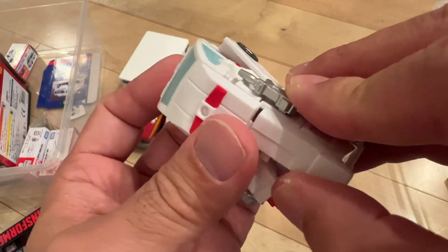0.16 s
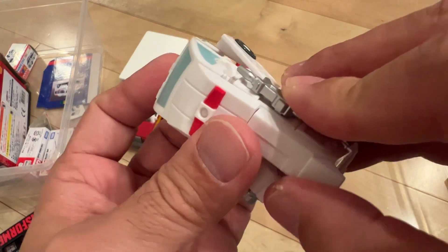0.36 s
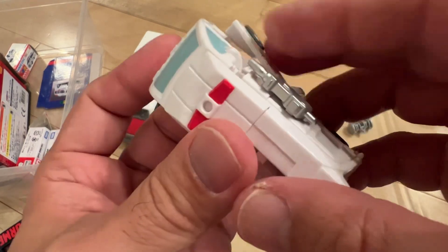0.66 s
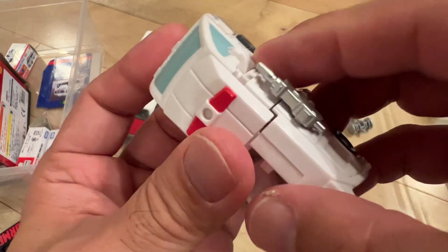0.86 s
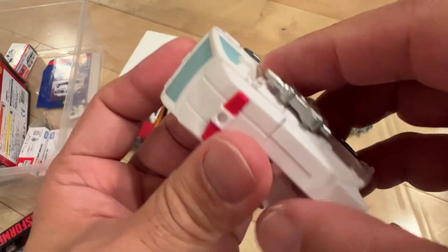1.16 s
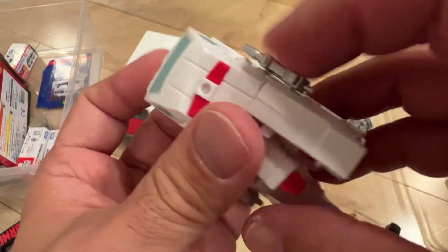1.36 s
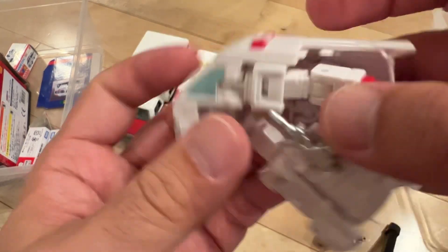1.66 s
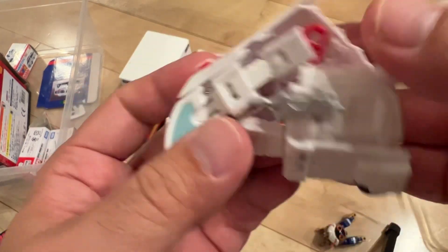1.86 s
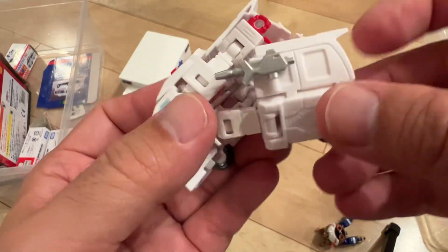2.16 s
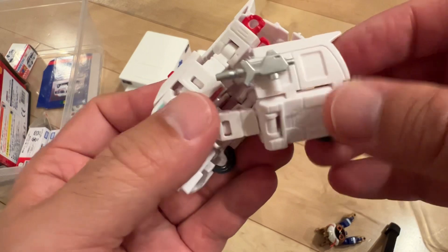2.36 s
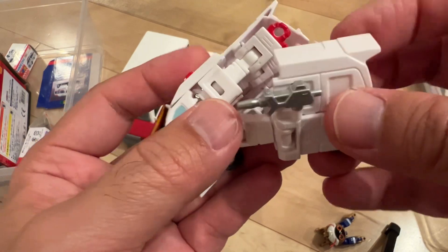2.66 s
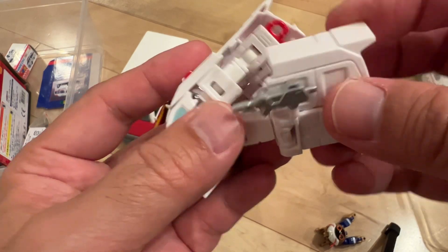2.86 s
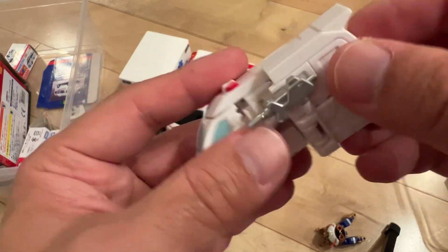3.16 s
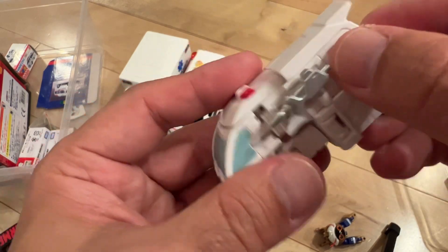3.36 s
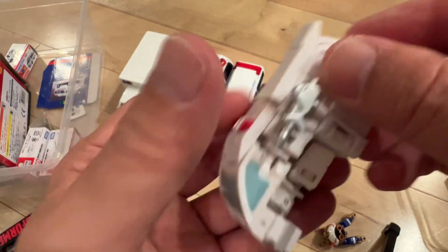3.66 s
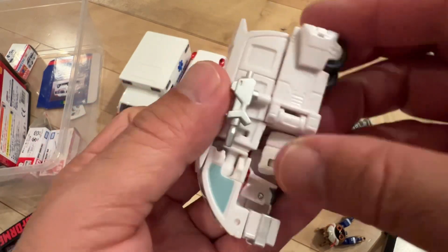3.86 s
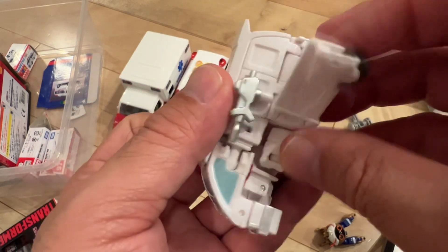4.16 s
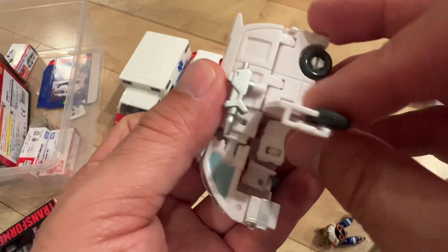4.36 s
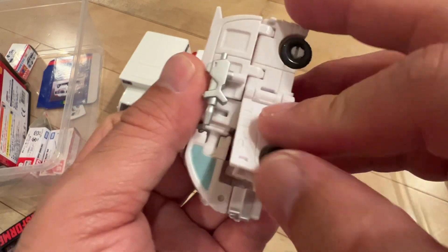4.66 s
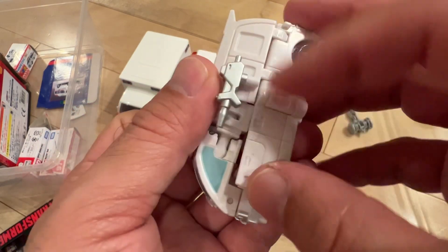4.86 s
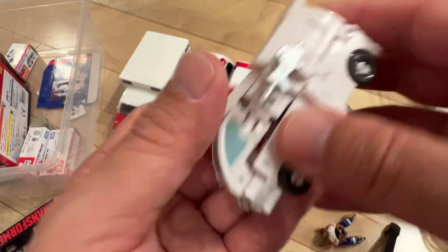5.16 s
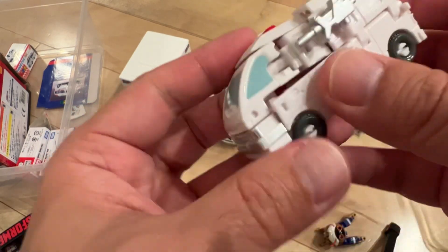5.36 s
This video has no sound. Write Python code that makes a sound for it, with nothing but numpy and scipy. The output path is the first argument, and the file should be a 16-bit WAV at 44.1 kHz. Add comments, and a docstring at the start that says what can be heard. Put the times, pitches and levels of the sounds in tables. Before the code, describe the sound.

Crisp plastic joints click and snap unevenly as fingers turn a little toy indoors, with soft scrapes, tiny creaks and quiet hum beneath.

```python
"""In a small room, close to a pair of microphones, hands fold a plastic toy car: tabs catch, joints snap, panels knock.
Each contact is a noise crack plus short ringing modes of the hollow shell; every snap also jolts the toy with a thud.
Fingers and panels rub in between as rough, slip-broken noise, and stiff hinges creak as irregular slips ring a panel.
The room answers with a diffuse tail, over shaped-noise rumble, a faint hum of sines and a thin, narrow-noise whine."""
import sys
import numpy as np
from scipy import signal
from scipy.fft import rfft, irfft, next_fast_len
from scipy.io import wavfile
from scipy.ndimage import map_coordinates

SR = 44100
rng = np.random.default_rng(int(sys.argv[2]) if len(sys.argv) > 2 else 0)


def master_out(mix):
    """Clip the mix to full scale and print it as 16-bit PCM to the path in sys.argv[1]."""
    frames = np.transpose(np.atleast_2d(mix))
    ceiling = np.clip(frames, -1, 1)
    pcm = np.round(ceiling * 32767).astype(np.int16)
    wavfile.write(sys.argv[1], SR, pcm)


N = 243431


def amp(db):
    """Decibels to gain."""
    return 10 ** (np.asarray(db) / 20)


def unit(x):
    """Scale to rms 1."""
    return x / np.sqrt(np.mean(x ** 2) + 1e-20)


def along(points, hz):
    """Read a curve of (Hz, value) points on a log frequency axis."""
    f, value = np.transpose(points)
    return np.interp(np.log(hz + 1), np.log(f + 1), value)


def filtered(x, response):
    """Shape x by a complex response of frequency."""
    n = x.shape[-1]
    padded = next_fast_len(n + n // 4)
    return irfft(rfft(x, padded) * response(np.fft.rfftfreq(padded, 1 / SR)), padded)[..., :n]


def resonance(f, hz, width_hz):
    """Causal response of one damped resonance."""
    return 1j * f * width_hz / (hz * hz - f * f + 1j * f * width_hz)


def wobble(rate):
    """A smooth random curve with rate knots a second."""
    knots = rng.standard_normal(int(N * rate / SR) + 4)
    return map_coordinates(knots, [np.arange(N) * rate / SR])


def lean(pair, points):
    """Shade the right microphone by the (Hz, left-minus-right dB) points."""
    return filtered(pair, lambda f: amp([0 * f, -along(points, f)]))


def add(track, start_s, sound):
    """Mix a sound into a track at start_s."""
    part = track[..., max(round(start_s * SR), 0):][..., :sound.shape[-1]]
    part += sound[..., :part.shape[-1]]


# Colour of the steady room rumble: pitch_hz, relative density_db [dB per Hz]
RUMBLE_COLOUR = [(20, -43.5), (32, -29), (45, -6.5), (65, -3), (100, -3), (130, -6), (200, -8), (300, -17),
                 (450, -21), (800, -25.5), (1500, -35.5), (2800, -44), (8000, -57.5), (16000, -68)]
# Left-right likeness of the rumble: pitch_hz, coherence [0 to 1]
RUMBLE_LIKENESS = [(60, 1), (125, .9), (250, 0.57), (500, 0.19), (1200, 0.083), (8000, .1)]
# Partials of the faint hum: pitch_hz, level_db [rms, before hum_gain_db]
HUM_PARTIALS = [(62, -63), (120, -67), (344, -76), (694, -84.5), (815, -85)]


def background(rumble_db=-55.5, hum_gain_db=1, whine_db=-86, whine_hz=5130):
    """Low indoor rumble, most alike at both microphones in the bass, an unsteady hum and a thin high whine."""
    # the split between mid and side sets the likeness
    turn = lambda f: np.arccos(np.clip(along(RUMBLE_LIKENESS, f), -1, 1)) / 2
    colour = lambda f: amp(along(RUMBLE_COLOUR, f)) * [np.cos(turn(f)), np.sin(turn(f))]
    mid, side = filtered(rng.standard_normal((2, N)), colour)
    rumble = unit(np.array([mid + side, mid - side]))

    t = np.arange(N) / SR
    hum = np.zeros(N)
    for hz, db in HUM_PARTIALS:
        level = amp(db + 0.63 * wobble(3)) * np.sqrt(2)
        hum += level * np.sin(2 * np.pi * hz * t + 1.1 * wobble(4.5))

    whine = unit(filtered(rng.standard_normal((2, N)), lambda f: resonance(f, whine_hz, 350) ** 2))
    return amp(rumble_db) * rumble + amp(hum_gain_db) * hum + amp(whine_db) * whine


def friction(slips_per_s, slip_share, alike):
    """Stereo noise of sliding contact: a fine hiss broken by tiny slips of uneven size."""
    struck = rng.exponential(size=N)
    sizes = amp(4 * np.minimum(struck, 3)) * (rng.random(N) < slips_per_s / SR)
    decay = amp(-60 * np.arange(SR // 50) / SR / 0.0086)
    slips = unit(signal.fftconvolve(sizes, decay)[:N])
    share, alike = np.clip([slip_share, alike], 0, 1)
    noise = np.sqrt(alike) * rng.standard_normal(N) + np.sqrt(1 - alike) * rng.standard_normal((2, N))
    return noise * np.sqrt(1 - share + share * slips ** 2)


# Strokes of fingers and panels, one for each move of the hands:
# middle_s, length_s, scrape_db [panels], swish_db [skin]
HAND_STROKES = [(0.566, 0.21, -84, -69), (1.21, 0.13, -68.5, -69), (1.392, 0.055, -72.5, -67),
                (1.652, 0.32, -69, -67.5), (2.121, 0.048, -68, -73.5), (2.256, 0.091, -74, -78.5),
                (2.471, 0.1, -58.5, -60.5), (2.878, 0.041, -58.5, -69), (3.137, 0.24, -74.5, -71.5),
                (3.363, .04, -53, -54), (3.728, 0.13, -65.5, -65), (3.966, 0.087, -72.5, -74),
                (4.225, 0.11, -68.5, -70), (4.536, 0.052, -57, -56), (4.971, 0.11, -64, -70.5),
                (5.416, 0.18, -70, -75.5)]


def stroke_level(t, peaks_db, grip_db):
    """Gain at times t: each stroke swells and fades over the resting grip."""
    middle, length = np.transpose(HAND_STROKES)[:2]
    swell = np.exp(-(2 * (t[:, None] - middle) / length) ** 2)
    return np.sqrt(swell @ amp(peaks_db) ** 2 + amp(grip_db) ** 2)


# Colour of skin on smooth plastic: pitch_hz, relative density_db [dB per Hz]
SKIN_COLOUR = [(500, -23), (2500, -5.5), (5500, -3), (7500, -10.5), (9000, 4), (10500, -14), (11800, -4),
               (13500, -14), (15300, -8.5), (16300, -11.5)]
# Body resonances that shape the scraping: pitch_hz, width_hz, relative level_db
BODY_RESONANCES = [(1500, 1500, -8), (3050, 170, 1.5), (3360, 370, -5.5), (4140, 200, -2), (4700, 760, -14),
                   (6500, 1100, -8)]


def body(f):
    """Response of the toy's body: resonances summed with alternating sign."""
    return sum((-1) ** k * amp(db) * resonance(f, hz, width)
               for k, (hz, width, db) in enumerate(BODY_RESONANCES))


def rubbing(grip_db=-85):
    """In each stroke skin swishes on plastic and panels scrape, sounding the body; the grip never quite rests."""
    _, _, scrape_db, swish_db = np.transpose(HAND_STROKES)
    coarse_t = np.arange(0, N, 64) / SR
    level = lambda db: np.interp(np.arange(N) / SR, coarse_t, stroke_level(coarse_t, db, grip_db))
    scrape = filtered(friction(slips_per_s=840, slip_share=0.44, alike=0.74), body)
    swish = friction(slips_per_s=500, slip_share=0.29, alike=.93)
    swish = filtered(swish, lambda f: amp(along(SKIN_COLOUR, f)))
    return level(scrape_db) * unit(scrape) + level(swish_db) * unit(swish)


# Decay of the room's answer: pitch_hz, t60_s
ROOM_DECAY = [(200, 0.1), (1500, 0.5), (4500, 0.4), (8000, .34), (14000, 0.27)]
# Colour of the room's answer: pitch_hz, gain_db [added to wet_db]
ROOM_TONE = [(200, -4.5), (1500, -8.5), (3200, -6.5), (6000, 0.5), (8000, -1.5), (10000, -21), (15000, -7)]


def room(x, wet_db, gap=0.00047):
    """Floor and walls return a diffuse noise tail, drawn afresh every quarter second; gap is its rise in s."""
    out, size = np.zeros((2, N)), SR // 4
    for start in range(0, N, size):
        hz, t, z = signal.stft(rng.standard_normal((2, SR // 2)), SR, nperseg=256)
        decay = amp(-60 * t / along(ROOM_DECAY, hz)[:, None])
        tail = signal.istft(z * decay, SR, nperseg=256)[1]
        tail = tail * (1 - np.exp(-np.arange(tail.shape[1]) / SR / gap))
        tail = tail / np.linalg.norm(tail[0])
        add(out, start / SR, signal.fftconvolve(x[None, start:start + size], tail, axes=1))
    return amp(wet_db) * filtered(out, lambda f: amp(along(ROOM_TONE, f)))


def loose_contacts(count=36, level_db=-68, follows=0.92, usual_db=-69, scatter_db=3,
                   knock_db=-2, part_db=0, tick_db=-5, part_hz=4100, spread=.08):
    """Loose parts tick faintly at random, more strongly while the hands move."""
    chance = rng.standard_normal((count, 4))
    times = (np.arange(count) + rng.random(count)) / count * N / SR
    scrape_db = np.transpose(HAND_STROKES)[2]
    moving_db = 20 * np.log10(stroke_level(times, scrape_db, grip_db=-79.5)) - usual_db
    return [(s, level_db + follows * move_db + scatter_db * a, knock_db + scatter_db * b,
             part_db, tick_db + scatter_db * c, part_hz * np.exp(spread * d))
            for s, move_db, (a, b, c, d) in zip(times, moving_db, chance)]


# Joints snapping over: a catch, the snap itself and the part seating, with a low jolt of the toy at its own delay.
# Knock, ring, tick, catch and seating are relative to level_db; the delays count from start_s.
# start_s, level_db, knock_db, part_ring_db, edge_tick_db, part_pitch_hz, catch_before_s, catch_db,
# seating_after_s, seating_db, jolt_after_s, jolt_db, jolt_pitch_hz
JOINT_SNAPS = [(0.1906, -44, -2, 6, -1.5, 2075, .002, -12, .029, -15, 0.0033, -48.5, 155),
               (0.7912, -22.5, -8.5, -4, 0.5, 3980, 0.0043, -13, .0047, -4, .006, -30.5, 195),
               (2.5798, -35, -7, -13.5, 0, 1240, 0.00158, -6, .011, -10, 0.00064, -47.5, 224),
               (3.3638, -36.5, 0.5, -4, -1, 2260, 0.007, -17.5, .008, -7, 0.0019, -45.5, 198),
               (4.1570, -31, -0.5, -1, 3.5, 3485, 0.0054, -2, .0045, -4, 0.0059, -36, 123),
               (4.2766, -29, -13, -3.5, 6, 3920, 0.004, -4, .0024, -6, .001, -44.5, 81),
               (4.4912, -35, 1.5, -3, 15, 3760, 0.0015, -16, .0005, 0.5, 0.0019, -40.5, 203.3),
               (4.726, -32, -2, -3, 6, 3610, 0.0051, -16, .011, -5.5, 0.0029, -41, 188),
               (5.0500, -20, -12, -10, -5.5, 3400, 0.0025, -15.5, .0023, -11, 0.0012, -40, 182.6)]
# a joint starts to slip before it catches: lead (s), and strength (dB re the catch)
SLIP_S, SLIP_DB = .0035, -16.5
# weaker contacts of a snap are duller: dB of edge tick lost per dB of level
DULLING = .25


def snap_contacts():
    """Each snap is a quick run of contacts on one part: a first slip, the catch, the snap and the seating."""
    contacts = []
    for s, db, knock_db, part_db, tick_db, hz, catch_s, catch_db, seat_s, seat_db, *_ in JOINT_SNAPS:
        steps = [(-catch_s - SLIP_S, catch_db + SLIP_DB), (-catch_s, catch_db), (0, 0), (seat_s, seat_db)]
        for delay, step_db in steps:
            contacts.append((s + delay, db + step_db, knock_db, part_db, tick_db + DULLING * step_db, hz))
    return contacts


# Single taps of plastic on plastic; knock, ring and tick are relative to level_db:
# start_s, level_db, knock_db, part_ring_db, edge_tick_db, part_pitch_hz
PLASTIC_TAPS = [(0.079, -67, 9, -5, -8, 3800), (0.4208, -69, 9.5, -2, 0.5, 4200),
                (0.56, -60.5, 2, -4, 2, 4600), (0.6608, -49.5, -6, -1.5, 12, 2240),
                (0.695, -49, 3.5, -2, 1, 2220), (1.1182, -58, 1, 0, -7, 4160),
                (1.1262, -57, -6, -10, 1, 4030), (1.1996, -49, -5, -4, 1.5, 3800),
                (1.236, -61, 4.5, -1, -3, 4180), (1.5518, -53.5, -1.5, -4, -16, 4290),
                (1.6006, -47.5, -10, 2.5, -6, 4170), (1.6404, -56, -3, -3, 5, 4180),
                (1.656, -54, 9.5, 1, 3, 4220), (1.7648, -54.5, -13, -0.5, -3, 2820),
                (1.8196, -49.5, -2, -4.5, -14, 4370), (1.8267, -55, -9.5, 2, -20, 4330),
                (1.9404, -75, 1, 7.5, -16, 4180), (2.2709, -58, -5, 7.5, -14.5, 3010),
                (2.4405, -36, -8, 2, 1, 3040), (2.4714, -43, -5.5, -12, 6.5, 4630),
                (2.49, -45.5, -11, -19, -29, 4500), (2.5977, -40, -16, -5.5, 3, 4290),
                (2.8346, -62.5, -14, -5, -12, 3600), (3.164, -56.5, -3, -1, 6.5, 2910),
                (3.19, -68.5, -6, 6, -6, 2350), (3.3308, -49, -2.5, -9, -2, 3840),
                (3.3352, -46, 0, -9, -3, 3500), (3.7402, -47, -20, -7, 2, 2970),
                (3.776, -61.5, -2, -3, 4.5, 4600), (3.812, -52.5, -16, -6, 2.5, 4290),
                (4.3854, -56, 1.5, -1, -6, 4060), (4.4855, -54, 3, 4.5, -11.5, 3550),
                (4.5517, -55, -21.5, 3.5, -21, 4000), (4.6421, -46.5, -9.5, -2, -5, 3940),
                (4.844, -62, -16, 7, -20, 4370), (4.9034, -63, 5, 4, -19, 2220),
                (4.936, -50, -5, -2, -26, 4180), (4.956, -56, 1.5, 0, -9, 4350),
                (5.0303, -25.5, -9, -3, -11, 4730), (5.0396, -38, -1, -9.5, -0.5, 4530),
                (5.1851, -53, -20, 3.5, -7, 4340), (5.267, -60, 2, -3, -26, 3470),
                (5.3583, -62.5, 5, 2, -16, 4120), (5.393, -55, -9.5, -13, -6.5, 3450)]


def toy_contacts():
    """Gather every contact that makes the toy click: snaps, single taps and loose parts."""
    return snap_contacts() + PLASTIC_TAPS + loose_contacts(count=36)


def click_sized(sound):
    """Scale to unit level, taken as energy spread over 5 ms."""
    span = .005 * SR
    return sound * np.sqrt(span / np.sum(sound ** 2, axis=1, keepdims=True))


def ring(hz, width_hz, crack_t60, ring_t60, ring_db, alike, attack):
    """One contact at both microphones: a crack, then the brief ring of a cluster of dense plastic modes."""
    t = np.arange(SR // 20) / SR
    near, other = rng.standard_normal((2, len(t)))
    alike = np.clip(alike, 0, 1)
    blow = np.array([near, alike * near + np.sqrt(1 - alike ** 2) * other])
    decay = amp(-60 * t / crack_t60) + amp(ring_db - 60 * t / ring_t60)
    blow = blow * decay * (1 - np.exp(-t / attack))
    return click_sized(filtered(blow, lambda f: resonance(f, hz, width_hz) ** 2))


def tones(modes, scatter_db):
    """Decaying single modes; each blow draws new strengths and phases, nearly in step at both microphones."""
    t = np.arange(SR // 20) / SR
    hz, db, t60 = np.transpose(modes)[:, :, None]
    phase = rng.uniform(0, 2 * np.pi, hz.shape) + 0.11 * rng.standard_normal((2, *hz.shape))
    size = amp(db + scatter_db * rng.standard_normal(hz.shape) - 60 * t / t60)
    ringing = np.sum(size * np.sin(2 * np.pi * hz * t + phase), axis=1)
    return click_sized(ringing * (1 - np.exp(-t / 0.00051)))


# Modes of the hollow shell, rung by every contact: pitch_hz, relative level_db, t60_s
SHELL_MODES = [(2225, -11, 0.048), (2993, -5, 0.046), (3336, 0, 0.043), (3604, 4.5, 0.026),
               (4130, -6, 0.028), (4250, 0, 0.02), (4890, -13.5, 0.0073), (5600, -10.5, 0.0099),
               (6220, -8.5, 0.077)]
# a gentle edge tick: centre, width, its ring re its crack
TICK_HZ, TICK_WIDTH_HZ, TICK_RING_DB = 9366, 3800, -11.5
# what a hard tick adds: the harder an edge slips, the higher, broader and drier it ticks
HARD_RISE_HZ, HARD_WIDEN_HZ, HARD_RING_DB = 2920, 3500, -11.5
# tick level that counts as hard, and how steeply hardness falls off below it (dB per dB)
HARD_TICK_DB, TICK_STEEPNESS = -17, 1.3


def clicks(contacts, part_gain_db, dense_db=-1, shell_db=-6, part_t60=0.013, edge_db=-7, edge_t60=0.0053,
           hard_db=-20, hard_rise=0.00031, softening=0.42):
    """Every contact knocks a panel, clacks the hollow shell, rings one part and ticks at the edge that slips."""
    out = np.zeros((2, N))
    for s, db, knock_db, part_db, tick_db, part_hz in contacts:
        # rise time of the click in s, set from its level
        rise = hard_rise * amp(softening * (hard_db - db - max(0, tick_db)))
        hard = amp(TICK_STEEPNESS * min(db + tick_db - HARD_TICK_DB, 0))
        tick_hz = TICK_HZ + HARD_RISE_HZ * hard

        knock = ring(1800, 2000, crack_t60=0.0064, ring_t60=0.048, ring_db=-18.0, alike=0.64, attack=rise)
        dense = ring(4035, 3200, crack_t60=0.0031, ring_t60=0.024, ring_db=-11.5, alike=0.22, attack=rise)
        clack = amp(dense_db) * dense + amp(shell_db) * tones(SHELL_MODES, scatter_db=8.5)
        part = tones([(part_hz, 0, part_t60)], scatter_db=0)

        tick = ring(tick_hz, TICK_WIDTH_HZ + HARD_WIDEN_HZ * hard, crack_t60=0.0017, ring_t60=0.016,
                    ring_db=TICK_RING_DB + HARD_RING_DB * hard, alike=1.0, attack=rise)
        # three edge modes scattered around the tick's centre
        edge_modes = [(tick_hz * amp(rng.normal(0, 1.1)), 0, edge_t60) for _ in range(3)]
        tick += amp(edge_db) * tones(edge_modes, scatter_db=6.5)

        click = amp(knock_db - 3.5) * knock + clack
        click += amp(part_db + part_gain_db) * part + amp(tick_db) * tick
        add(out, s, amp(db) * click)
    return out


def jolts(cycles=3.47, attack=0.00021, thud_db=-8):
    """With each snap the toy kicks against the fingers, damped 60 dB in a few cycles; its hollow inside thuds."""
    out, t = np.zeros((2, N)), np.arange(SR // 8) / SR
    for s, *_, delay, db, hz in JOINT_SNAPS:
        kick = amp(8.5 - 60 * t * hz / cycles) * (1 - np.exp(-t / attack)) * np.sin(2 * np.pi * hz * t)
        thud = ring(340, 300, crack_t60=0.004, ring_t60=0.066, ring_db=-11.5, alike=0.63, attack=.0007)
        add(out, s + delay, amp(db) * kick)
        add(out, s + delay, amp(db) * amp(thud_db) * thud)
    return out


# Tight joints creaking as they turn: middle_s, length_s, level_db, pitch_hz
JOINT_CREAKS = [(1.448, 0.065, -73, 4800), (1.564, 0.051, -62, 4150), (1.635, 0.066, -63, 4250),
                (1.762, 0.027, -61.5, 4160), (1.847, 0.057, -67, 4370), (2.266, .033, -70, 3680),
                (2.863, .025, -63.5, 3520), (3.736, 0.037, -54.5, 2990), (4.951, 0.031, -57, 4320)]


def creaks(slips_per_s=260, width_hz=300):
    """A stiff hinge sticks and slips at an uneven rate, each slip ringing one panel."""
    out, t = np.zeros((2, N)), np.arange(SR // 3) / SR
    for middle, length, db, hz in JOINT_CREAKS:
        slips = (rng.random(len(t)) < slips_per_s / SR) * amp(3.4 * rng.standard_normal(len(t)))
        panel = unit(filtered(slips, lambda f: resonance(f, hz, width_hz)))
        swell = np.exp(-2 * ((t - t.mean()) / length) ** 2)
        add(out, middle - t.mean(), amp(db) * panel * swell)
    return out


# How much louder the left microphone hears the toy: pitch_hz, left_minus_right_db
TOY_BALANCE = [(150, 4.5), (900, 11), (2000, 6), (3500, 12), (5500, 11.5), (7500, 3.5), (10000, -0.5),
               (15000, 2)]
# How much louder the left microphone hears the room: pitch_hz, left_minus_right_db
ROOM_BALANCE = [(30, 3.5), (125, 3), (400, 7.5), (1500, 3), (4400, 9), (8000, 5.5), (11000, 0.5)]


def scene():
    """The toy's sound reaches the right microphone a little earlier, but shaded by the hand."""
    contacts = toy_contacts()
    toy = clicks(contacts, part_gain_db=1.5) + rubbing() + creaks() + jolts()
    lead = .00025  # s
    advance = lambda f: np.exp(2j * np.pi * f * np.array([[0], [lead]]))
    direct = filtered(lean(toy, TOY_BALANCE), advance)
    # the shell radiates a different pattern away from the microphones, which fills in the room's answer
    away = clicks(contacts, part_gain_db=-12)
    echo = room(toy[0], wet_db=-15.5) + room(away[0], wet_db=-16.0) + room(away[1], wet_db=-16.5)
    return direct + lean(echo + background(), ROOM_BALANCE)


def record(dry, top_hz=16300):
    """The microphones' band ends in a very steep low-pass at top_hz."""
    return filtered(dry, lambda f: 1 / np.sqrt(1 + (f / top_hz) ** 160))


dry = scene()
out = record(dry)
master_out(out)
```